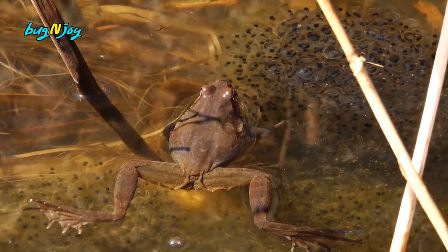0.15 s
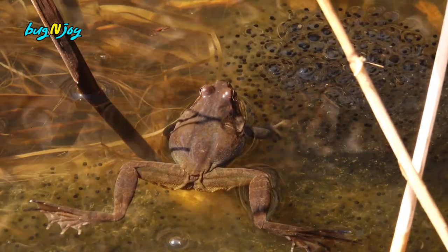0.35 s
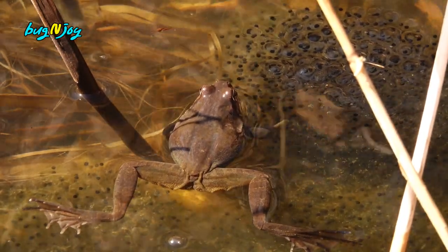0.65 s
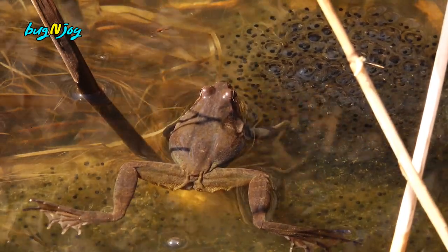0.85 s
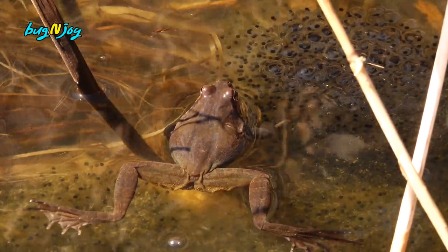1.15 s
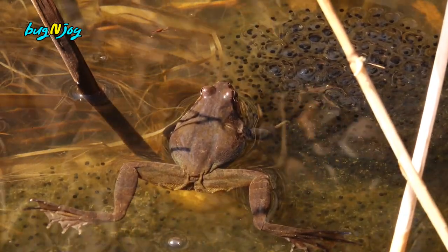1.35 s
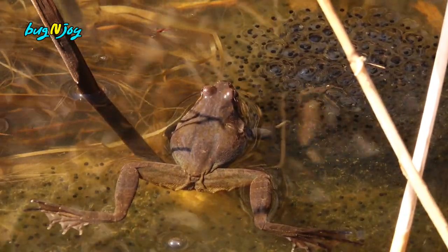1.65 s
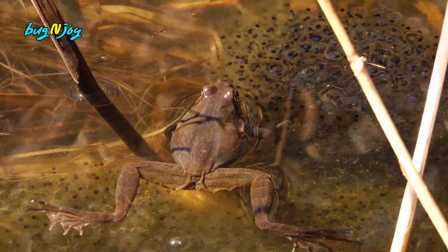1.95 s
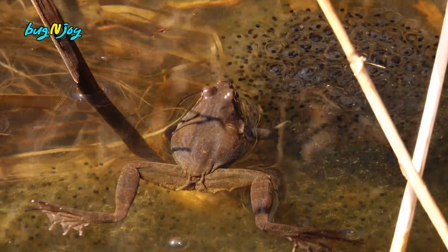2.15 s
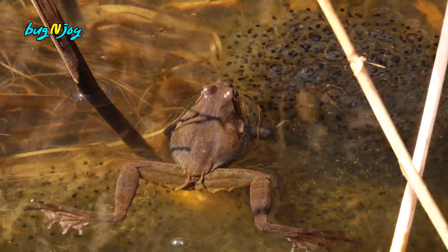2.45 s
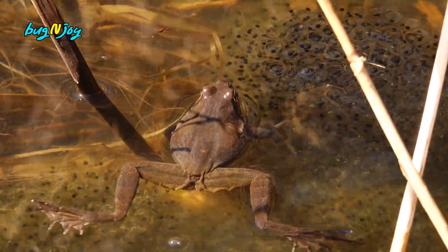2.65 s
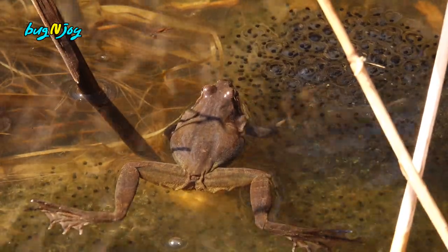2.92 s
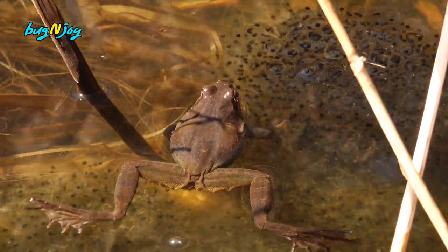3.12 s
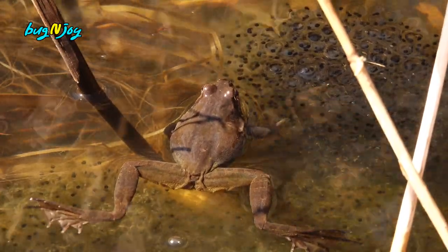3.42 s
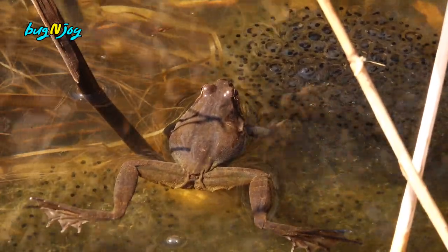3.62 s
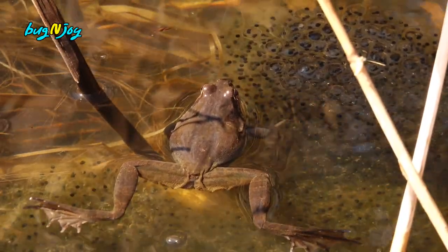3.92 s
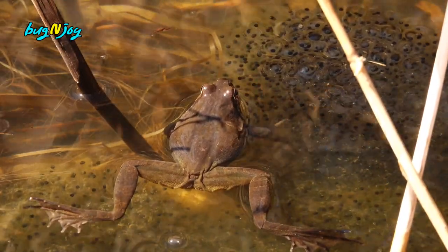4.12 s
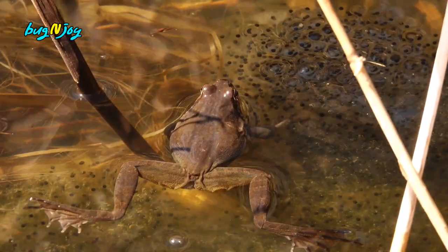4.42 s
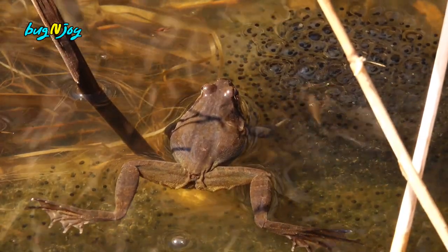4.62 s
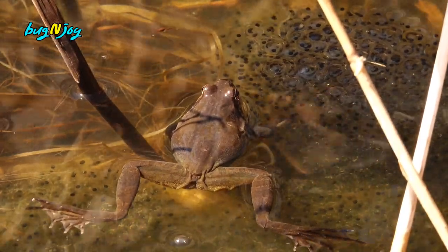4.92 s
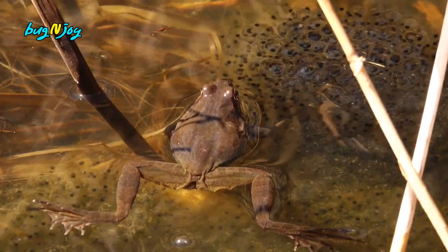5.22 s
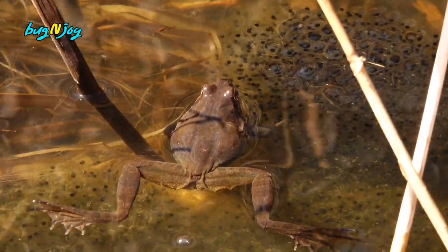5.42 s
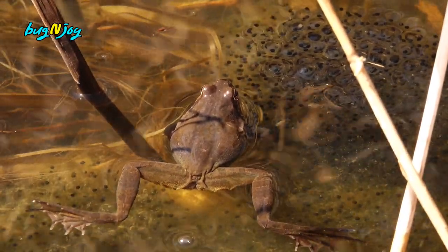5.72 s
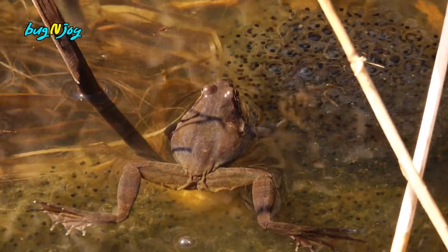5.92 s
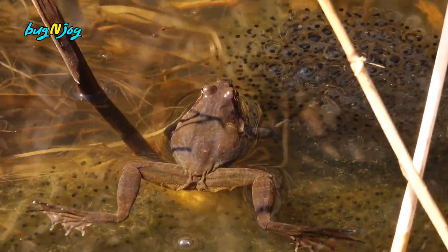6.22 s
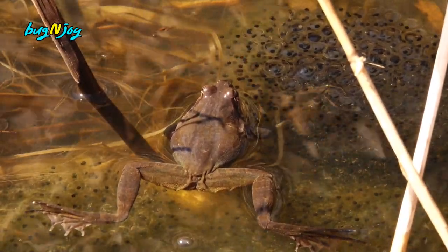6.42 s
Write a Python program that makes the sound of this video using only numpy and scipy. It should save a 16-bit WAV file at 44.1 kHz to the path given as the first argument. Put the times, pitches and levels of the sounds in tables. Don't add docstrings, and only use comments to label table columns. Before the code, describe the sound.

Many frogs call together, nearby ones pulsing note by note over a blurred far crowd, with thin squeaks and tiny dry clicks.

```python
import sys
import numpy as np
from scipy import signal
from scipy.io import wavfile
from scipy.ndimage import uniform_filter1d

SR = 44100
rng = np.random.default_rng(int(sys.argv[2]) if len(sys.argv) > 2 else 0)


def store_pcm(level_fs):
    pcm = np.round(np.clip(level_fs, -1, 1) * 32767).astype(np.int16)
    wavfile.write(sys.argv[1], SR, np.atleast_2d(pcm).T)


def boost(x):
    u = np.asarray(x, float) / 20
    return 10 ** u


N = 289296

# start_s, hiss_db
BREEZE_STIR = [
    (0.0, -67),
    (0.77, -66.5),
    (1.08, -75),
    (2.32, -62),
    (3.6, -67.5),
    (4.97, -60),
    (5.3, -64),
    (6.43, -68),
    (6.56, -65),
]
# frequency_hz, density_db (per Hz)
BREEZE_SPECTRUM = [(5000, -13.5), (7000, 1.5), (9000, -16.5), (11000, 2.5), (13500, 3), (15800, -2)]
# start_s, peak_db, brightness_db
REED_TICKS = [(0.8819, -50, -15), (1.9579, -39, -22), (2.0128, -42, -10), (2.8459, -51, -5),
              (3.2086, -36, -17), (3.249, -37, -16), (3.272, -35, -18), (3.4052, -37, -15),
              (3.4321, -35, -17), (3.492, -44, -12), (3.5768, -45, -13), (3.6182, -45, -11),
              (3.6711, -44, -16), (3.7948, -46, -12), (3.8187, -39, -18), (3.8696, -36, -19),
              (3.9968, -31, -13), (4.0497, -45, -12), (4.2532, -49, -11), (4.6708, -46, -9),
              (4.7481, -43, -15), (4.776, -42, -14), (4.8035, -40, -16), (4.8374, -45, -13),
              (4.8594, -44, -14), (4.9467, -42, -13), (5.0265, -40, -15), (5.8067, -44, -14),
              (5.8516, -41, -14), (6.5306, -40, -10)]
# start_s, length_s, level_db
REED_CREAKS = [
    (3.826, .135, -46),
    (4.75, .29, -50),
    (5.74, .24, -51),
]
# delay_s, level_db
BANK_ECHOES = [
    (.013, -22),
    (.029, -14.5),
    (.047, -15),
]
# start_s, level_db, strain_db (on the upper partials), pitch_hz
CROWD_COURSE = [(0.0, -24.5, -6.5, 644), (0.86, -19, -4, 705.6), (1.11, -24, -6.5, 738.4),
                (1.31, -28, -5, 623), (1.48, -22, -3.5, 664.7), (2.37, -18, -5, 673.7),
                (2.54, -20, -0.5, 751), (2.67, -22, -5.5, 630), (3.31, -20.5, -1.5, 688),
                (3.62, -26, -6, 677), (4.51, -17, -6, 670), (4.79, -23, -2, 686), (5.01, -26, -5.5, 577),
                (5.13, -23.5, -5.5, 732), (5.86, -24, -4.5, 662.8), (6.28, -23.5, -5, 759.7),
                (6.43, -28, 1.5, 592.2), (6.56, -24, -4, 742.6)]
# centre_s, half_width_s, depth_db
CROWD_LULLS = [
    (1.19, 0.12, -8),
    (2.625, 0.028, -7.5),
    (3.784, 0.027, -15),
    (4.94, 0.13, -4),
    (6.22, 0.081, -5.5),
]
# frequency_hz, gain_db
FAR_RESONANCE = [(500, -9.5), (620, -7), (780, -4.5), (950, -4), (1150, -5.5), (1350, 1), (1600, -4),
                 (1900, -13), (2800, -21), (4000, -23), (5000, -37), (6500, -48)]
# centre_s, pitch_hz, level_db
THROAT_SQUEAKS = [(0.2, 2150, -30), (0.275, 2110, -61), (0.348, 2125, -26), (0.69, 2950, -35),
                  (0.734, 4320, -37.5), (0.96, 3440, -37.5), (2.037, 2580, -29.5), (2.478, 2270, -30),
                  (2.541, 2400, -30), (2.548, 3840, -37.5), (2.58, 2475, -29.5), (3.165, 5590, -56),
                  (3.172, 3475, -36), (3.21, 5050, -45), (3.223, 3375, -30), (3.81, 3060, -35),
                  (3.889, 3320, -39), (3.939, 4030, -38), (5.263, 3040, -32), (5.345, 2376, -27),
                  (5.658, 4950, -45), (5.706, 4670, -43.5), (5.739, 4450, -35), (5.804, 4010, -32.5),
                  (5.845, 3930, -36), (5.884, 3800, -32.5), (5.72, 5800, -56), (5.81, 5600, -53.5),
                  (5.938, 3800, -32), (6.051, 4410, -50.5), (6.125, 4120, -43), (6.429, 4340, -40.5),
                  (6.491, 4310, -42.5)]
# frequency_hz, gain_db
NEAR_RESONANCE = [(500, -14), (620, -10.5), (780, -20), (950, 0.5), (1150, 0), (1350, 4), (1600, -9.5),
                  (1900, -15), (2800, -27), (4000, -28.5), (5000, -44), (6500, -66.5)]
# first_note_s, last_note_s, first_pitch_hz,
# last_pitch_hz, level_db
SCATTERED_FROGS = [(0.017, 0.017, 639, 636, -18.5), (1.047, 1.047, 774, 772, -21), (1.175, 1.275, 764, 783, -40),
                   (1.21, 1.21, 577, 575, -27.5), (1.35, 1.4, 640.4, 652, -19), (2.49, 2.58, 835, 810, -28),
                   (3.126, 3.187, 745, 672, -15.5), (3.41, 3.516, 805, 849, -30.5), (4.2, 4.26, 616, 620, -25.5),
                   (4.52, 4.585, 679.5, 648, -16.5), (5.11, 5.175, 518, 505, -32.5), (5.2, 5.255, 813, 823, -30),
                   (5.365, 5.43, 840.5, 827, -26.5), (5.89, 5.89, 707, 690, -16.5),
                   (6.155, 6.32, 789, 821, -29.5), (6.17, 6.17, 566, 555, -24)]
# first_note_s, last_note_s, first_pitch_hz, last_pitch_hz, level_db
LEFT_FROGS = [(0.027, 0.255, 654.6, 705.4, -17), (0.123, 0.354, 702.2, 705.0, -13),
              (0.918, 1.002, 741, 778, -14.5), (1.146, 1.233, 814, 825, -24.5),
              (1.263, 1.464, 603, 671.5, -15.5), (1.506, 1.56, 767, 745, -21.5),
              (2.244, 2.475, 714, 790.4, -15), (2.709, 3.063, 683.5, 573, -20.5),
              (2.82, 3.039, 668, 722, -18), (2.844, 2.916, 783, 780.0, -18),
              (4.116, 4.329, 602.5, 680, -28), (4.407, 4.566, 610, 592, -24.5),
              (4.431, 4.482, 760, 782, -15), (4.443, 4.53, 620, 632.5, -16.5),
              (4.512, 4.74, 691.6, 706.6, -18), (4.572, 4.713, 749, 759, -23.5),
              (5.235, 5.298, 581, 580, -25), (5.946, 6.0, 723, 749, -15), (6.246, 6.405, 609, 632, -20)]
# first_note_s, last_note_s, first_pitch_hz, last_pitch_hz, level_db
CENTRE_FROGS = [(0.615, 0.975, 713.7, 664.0, -15), (0.795, 0.948, 636.4, 698, -19),
                (1.431, 1.506, 681, 637.6, -14.9), (1.905, 2.22, 663, 725, -22),
                (2.004, 2.139, 682, 751, -18), (2.298, 2.544, 637, 676.6, -15),
                (2.31, 2.664, 669.7, 659, -18), (3.12, 3.477, 722.3, 654, -18.0),
                (3.222, 3.45, 641, 711, -23.5), (3.582, 3.663, 661, 642, -24.5),
                (3.759, 3.96, 625.3, 709.5, -16.5), (3.981, 4.164, 688.5, 732, -25),
                (4.065, 4.176, 767, 814, -24.7), (4.62, 4.803, 544.0, 625, -21.5),
                (5.04, 5.109, 670, 713, -21), (5.196, 5.427, 710, 727, -18.5),
                (5.679, 5.826, 652, 697, -15), (5.823, 5.982, 627, 659, -17),
                (5.937, 6.141, 682.7, 690, -14.5)]
# first_note_s, last_note_s, first_pitch_hz, last_pitch_hz, level_db
RIGHT_FROGS = [(0.303, 0.465, 640.0, 675.5, -18), (0.432, 0.609, 611, 631.4, -19.5),
               (1.617, 1.839, 677.4, 651.6, -17), (1.68, 1.893, 769.3, 738.5, -17.5),
               (1.884, 2.13, 636.4, 648.3, -16.4), (2.031, 2.142, 810, 809, -24),
               (2.586, 2.805, 674, 751, -18.5), (3.186, 3.378, 613, 621, -26),
               (3.525, 3.645, 670, 735, -29), (3.753, 3.864, 736.0, 776, -24),
               (4.014, 4.164, 620, 698, -22.5), (4.47, 4.524, 800.0, 794, -20.5),
               (4.689, 5.055, 610, 624, -22.5), (5.133, 5.265, 740.4, 740, -19),
               (5.391, 5.568, 649.4, 643, -24.5), (5.463, 5.538, 671, 669.5, -17),
               (5.664, 5.775, 713, 750, -23), (6.438, 6.552, 727, 743, -24), (6.438, 6.51, 628, 702, -20.5)]


def rms_one(x):
    return x / np.sqrt(np.mean(x ** 2) + 1e-20)


def in_time(rows):
    times_s, *columns = np.transpose(rows)
    return [np.interp(np.arange(N) / SR, times_s, column) for column in columns]


def at_hz(points, hz):
    point_hz, point_db = np.transpose(points)
    return np.interp(np.log(hz), np.log(point_hz), point_db)


def drift(rate_hz):
    r = np.exp(-2 * np.pi * rate_hz / SR)
    noise = rng.standard_normal(N + 9000)
    return rms_one(signal.lfilter([1], [1, -2 * r, r * r], noise)[9000:])


def wide_noise(likeness):
    mid, side = rng.standard_normal((2, N))
    alike = np.clip(likeness, 0, 1)
    return np.sqrt(1 + alike) * mid + np.sqrt(1 - alike) * side * [[1], [-1]]


def bandpass(x, band_hz, order):
    return signal.sosfilt(signal.butter(order, band_hz, "band", fs=SR, output="sos"), x)


def breeze(hiss_db):
    out = 0
    edges_hz = np.geomspace(5000, 16000, 7)
    grain = boost(0.95 * drift(40))
    for low, high in zip(edges_hz, edges_hz[1:]):
        band = bandpass(wide_noise(0.35), [low, high], 2)
        patch_db = 2.8 * drift(9) + 2.4 * drift(70)
        out = out + boost(at_hz(BREEZE_SPECTRUM, np.sqrt(low * high)) + patch_db) * band
    return boost(hiss_db) * grain * rms_one(out)


def reeds(tail_s=0.001, crackle_per_s=150, crackle_db=-13, lift_db=-2.5, colour=0.68):
    at_s, db, bright_db = np.transpose(REED_TICKS)
    strikes = np.zeros(N)
    strikes[(at_s * SR).astype(int)] = boost(db + lift_db)

    shaken = signal.lfilter([1], [1, -np.exp(-1 / (0.033 * SR))], strikes + 1e-18)
    sizes_db = crackle_db + 3 * np.minimum(rng.exponential(1, N), 2)
    strikes = strikes + shaken * boost(sizes_db) * (rng.random(N) < crackle_per_s / SR)

    slip_gap_s = .012
    slips = [(t, level) for s, length, level in REED_CREAKS for t in np.arange(s, s + length, slip_gap_s)]
    slip_s, slip_db = np.transpose(slips)
    late, strong = rng.standard_normal((len(slip_s), 2)).T
    strikes[((slip_s + .2 * slip_gap_s * late) * SR).astype(int)] += boost(slip_db + 2.5 * strong)

    tilt_db = colour * np.interp(np.arange(N) / SR, at_s, bright_db - bright_db.mean())
    tilt = boost(tilt_db + 1.5 * drift(30))
    out = 0
    for band_hz, gain in (([4500, 10500], boost(0.5) / tilt), ([10500, 15500], boost(3.0) * tilt)):
        decay = signal.lfilter([1], [1, -np.exp(-1 / (tail_s * SR))], gain * strikes + 1e-18)
        out = out + bandpass(decay * np.sign(wide_noise(0.5)), band_hz, 2)
    return out


def banks(x, aside_db=7.0):
    thin = bandpass(x.mean(axis=0), [1200, 6000], 1)
    out = x.copy()
    for k, (delay_s, db) in enumerate(BANK_ECHOES):
        lag = int(delay_s * SR)
        side_db = aside_db * (-1) ** k * np.array([[1], [-1]])
        out[:, lag:] += boost(db + side_db) * thin[:-lag]
    return out


def lulls_db():
    t = np.arange(N) / SR
    return sum(db * np.exp(-((t - s) / width) ** 2) for s, width, db in CROWD_LULLS)


def crowd_notes(count, crowd_hz, follows=0.818, spacing_s=.07, low_hz=610, spread_hz=125, climb_hz=16, width_db=11):
    notes = []
    for call, (when, size, place, loud, pace, number) in enumerate(rng.random((count, 6))):
        call_s = (call + when) / count * (N / SR + .5) - .5
        steps = np.arange(5 + int(7 * number))
        for k, (late, slide, strong) in zip(steps, rng.standard_normal((len(steps), 3))):
            s = call_s + spacing_s * (k * (.85 + .3 * pace) + .06 * late)
            crowd_shift_hz = crowd_hz[int(np.clip(s * SR, 0, N - 1))] - crowd_hz.mean()
            hz = low_hz + spread_hz * (size - .5) + climb_hz * k + follows * crowd_shift_hz
            level_db = -4 * loud + 1.3 * strong
            notes.append((s, np.clip(hz, 515, 880), level_db, .03 + .025 * pace,
                          -.05 + .08 * slide, width_db * (place - .5)))
    return [note for note in notes if 0 < note[0] < N / SR]


def squeaks(arch=0.38, glide=-0.05, width_db=6.5):
    out = np.zeros((2, N))
    flutter = 1 + .45 * drift(150)
    shake = 1 + .012 * drift(90)
    squeak_s = .042
    u = np.linspace(-.5, .5, int(squeak_s * SR))
    for (s, hz, db), place in zip(THROAT_SQUEAKS, rng.standard_normal(len(THROAT_SQUEAKS))):
        span = int(s * SR) - len(u) // 2 + np.arange(len(u))
        pitch = hz * (1 + glide * u - arch * u * u) * shake[span]
        wave = np.sin(np.cumsum(2 * np.pi * pitch / SR))
        tone = flutter[span] * np.cos(np.pi * u) ** 2 * wave
        out[:, span] += boost(db + width_db * place * np.array([[.5], [-.5]])) * tone
    return out


def near_notes(calls, pan_db):
    note_gap_s, note_s, note_spread_s = .068, .045, .008
    glide, glide_spread, uneven_db = -0.059, 0.048, 0.5
    notes = []
    for first_s, last_s, first_hz, last_hz, db in calls:
        count = round((last_s - first_s) / note_gap_s) + 1
        times_s = np.linspace(first_s, last_s, count)
        pitches_hz = np.linspace(first_hz, last_hz, count)
        luck = np.clip(rng.standard_normal((8, 3)), -2, 2)
        for s, hz, (strong, long, slide) in zip(times_s, pitches_hz, luck):
            length_s = max(note_s + note_spread_s * long, .015)
            notes.append((s, hz, db + uneven_db * strong, length_s, glide + glide_spread * slide, pan_db))
    return notes


def croak(notes, sac, strain_db, arch, wobble, colour_db, breath, from_second=False):
    out = np.zeros((2, N + SR))
    shake, flutter = drift(53), drift(220)
    order = np.arange(1, 9)[:, None]
    upper = order > 2
    spread_db = np.where(upper, colour_db, 0.43 * (order < 2))
    chance = rng.standard_normal((len(notes), 16))
    for (s, hz, db, length_s, glide, pan_db), luck in zip(notes, chance):
        u = np.linspace(-.5, .5, int(length_s * SR))
        centre = int(np.clip(s * SR, 0, N - 1))
        own = (int(abs(luck[1]) * SR) + centre + np.arange(len(u))) % N
        pitch = hz * (1 + glide * u - arch * u * u + wobble * shake[own])
        gains_db = at_hz(sac, order * hz) + spread_db * luck[:8, None] + upper * strain_db[centre]
        if from_second:
            gains_db = gains_db - at_hz(sac, 2 * hz)
        phase = order * np.cumsum(2 * np.pi * pitch / SR) + 9 * luck[8:, None]
        stack = np.sum(boost(gains_db) * np.sin(phase), axis=0)
        swell = boost(db) * np.cos(.999 * np.pi * u) * (1 + breath * flutter[own])
        start = centre + SR // 2 - len(u) // 2
        out[:, start:start + len(u)] += swell * stack * boost([[pan_db / 2], [-pan_db / 2]])
    return out[:, SR // 2:SR // 2 + N]


def scene():
    crowd_db, strain_db, crowd_hz = in_time(CROWD_COURSE)
    (hiss_db,) = in_time(BREEZE_STIR)
    left_db, centre_db, right_db = 3.5, 1, -4
    placed = near_notes(LEFT_FROGS, left_db) + near_notes(CENTRE_FROGS, centre_db)
    placed += near_notes(RIGHT_FROGS, right_db) + near_notes(SCATTERED_FROGS, centre_db)
    far = croak(crowd_notes(count=125, crowd_hz=crowd_hz), FAR_RESONANCE, strain_db,
                arch=0.3915, wobble=0.0068, colour_db=4.5, breath=.13)
    near = croak(placed, NEAR_RESONANCE, strain_db,
                 arch=0.266, wobble=0.0048, colour_db=3.5, breath=.1, from_second=True)
    crowd = boost(crowd_db - 3 + lulls_db()) * rms_one(far)
    return banks(near + crowd + squeaks()) + breeze(hiss_db + 2.0) + reeds()


def band_limit(x):
    return signal.sosfilt(signal.butter(12, 15830, fs=SR, output="sos"), x)


def record(dry):
    loudness = np.sqrt(uniform_filter1d(np.mean(dry ** 2, axis=0), 1500) + 1e-12)
    mush = signal.sosfilt(signal.butter(2, 1500, fs=SR, output="sos"), wide_noise(.94))
    rasp = bandpass(wide_noise(1.0), [520, 1900], 6)
    mush_db, rasp_db, low_cut_hz = -36.5, -24, 462
    added = loudness * (boost(mush_db) * rms_one(mush) + boost(rasp_db) * rms_one(rasp))
    kept = signal.sosfilt(signal.butter(6, low_cut_hz, "high", fs=SR, output="sos"), dry)
    return band_limit(kept + added)


dry = scene()
out = record(dry)
store_pcm(out)
```